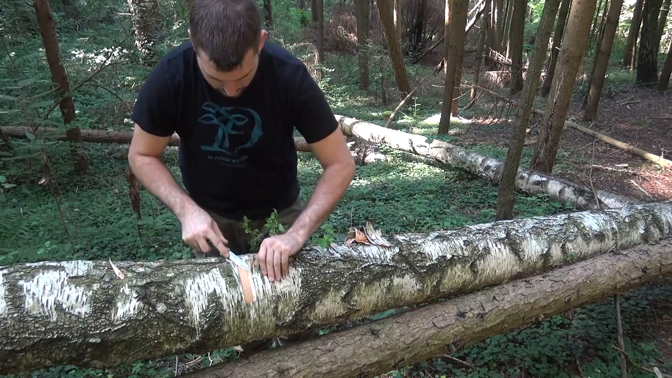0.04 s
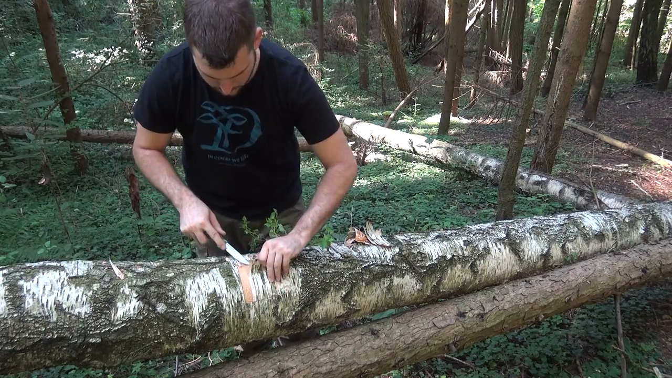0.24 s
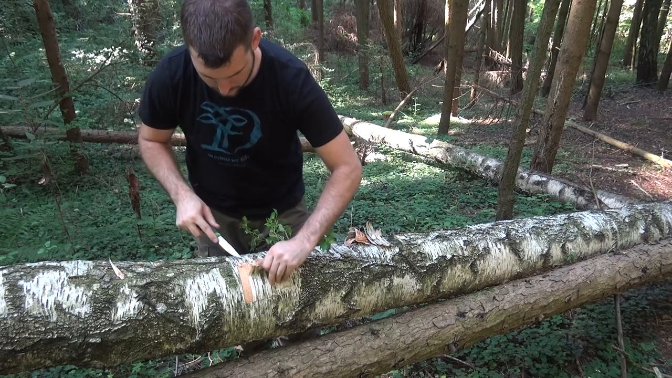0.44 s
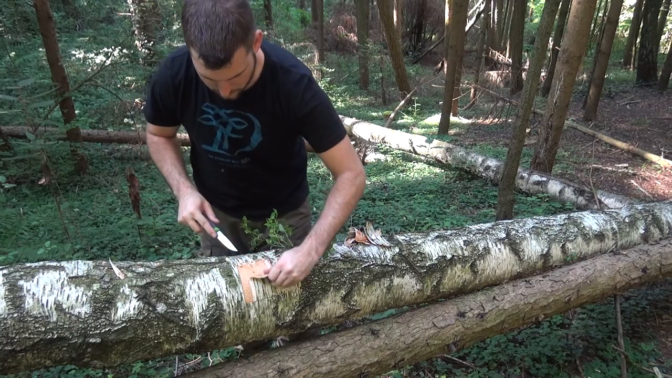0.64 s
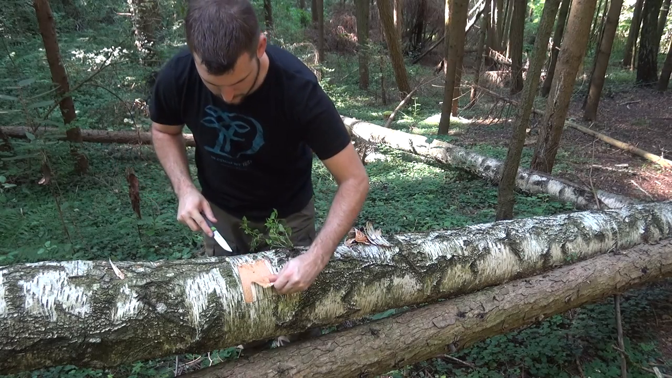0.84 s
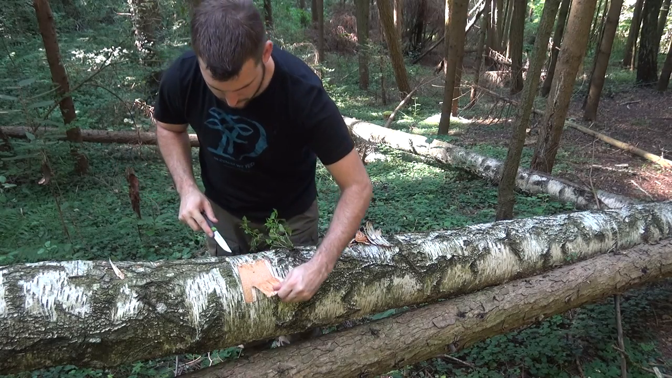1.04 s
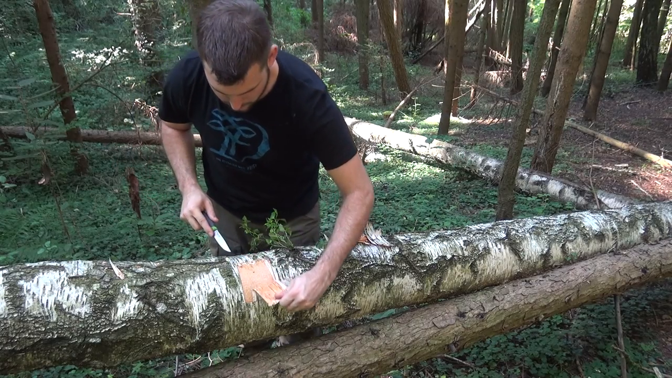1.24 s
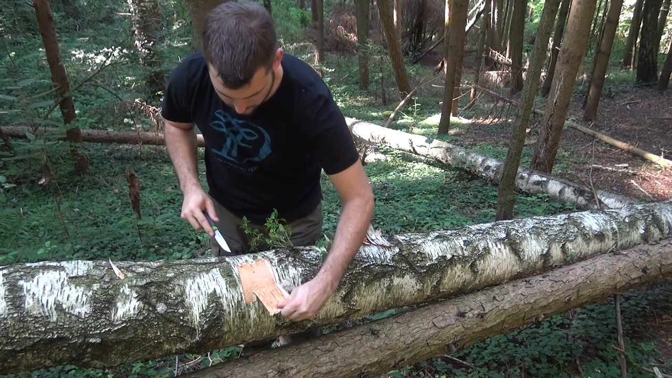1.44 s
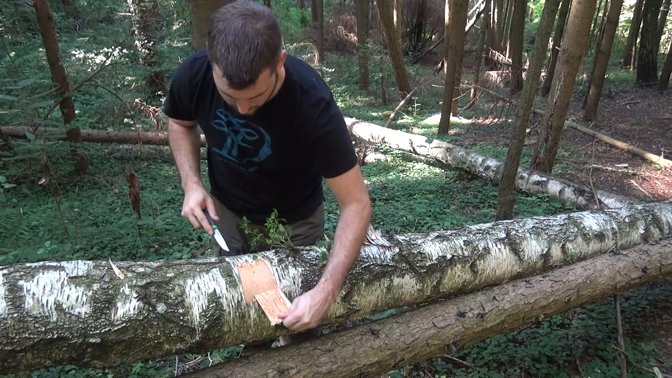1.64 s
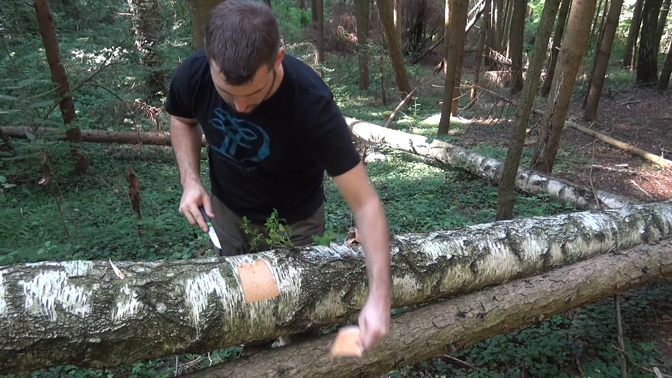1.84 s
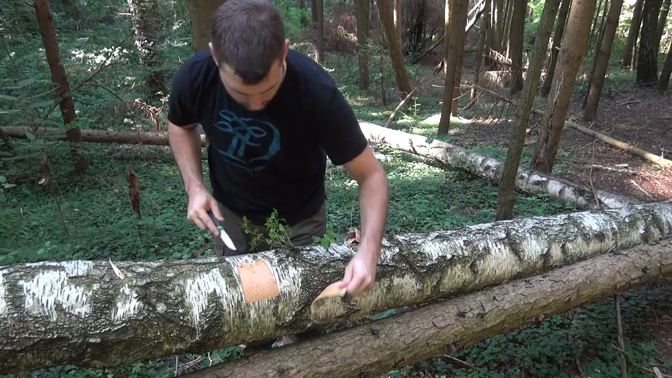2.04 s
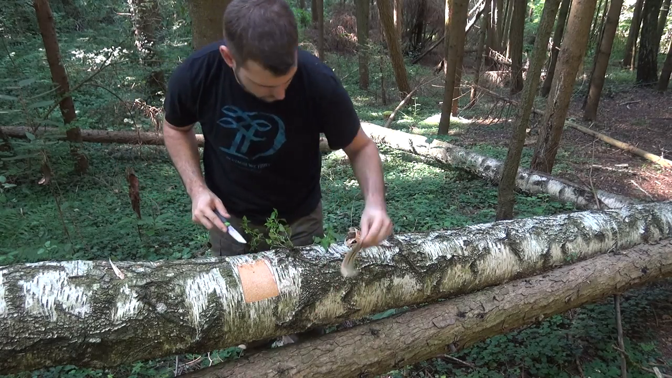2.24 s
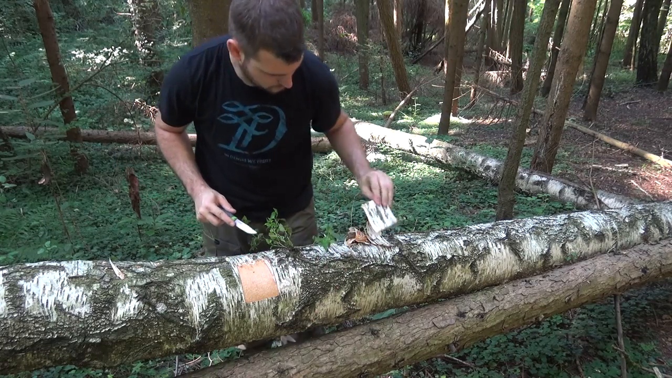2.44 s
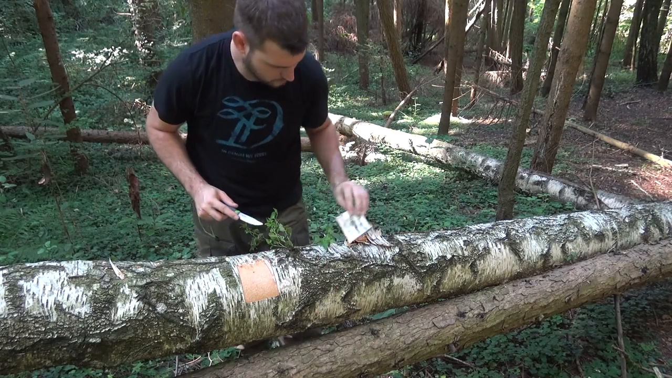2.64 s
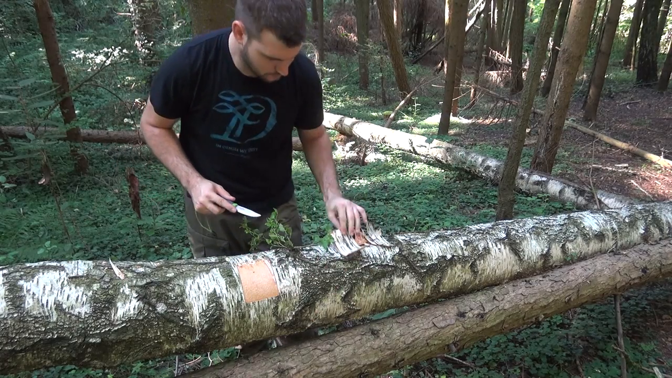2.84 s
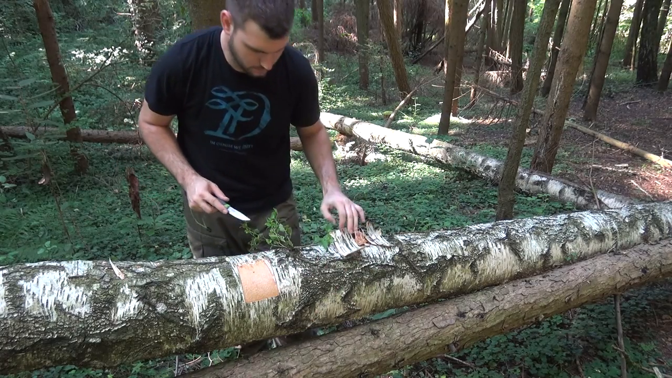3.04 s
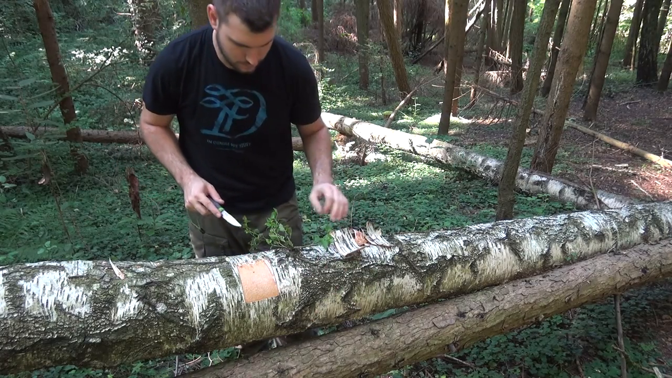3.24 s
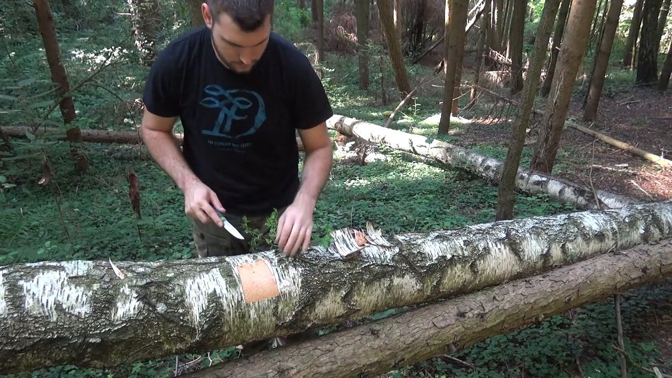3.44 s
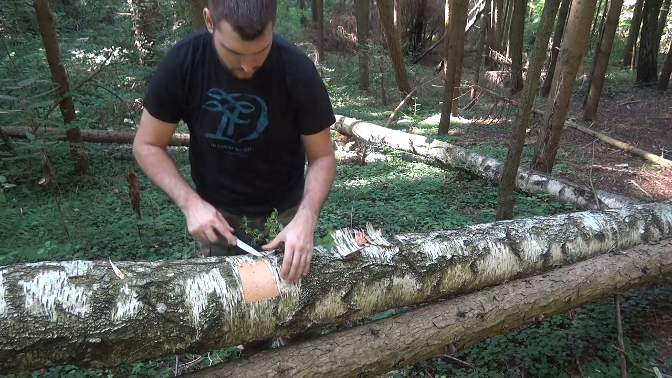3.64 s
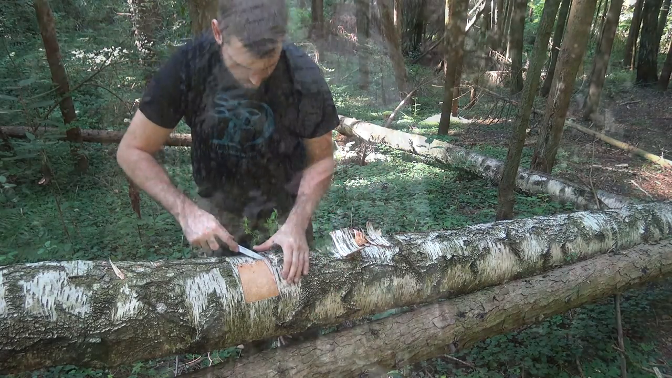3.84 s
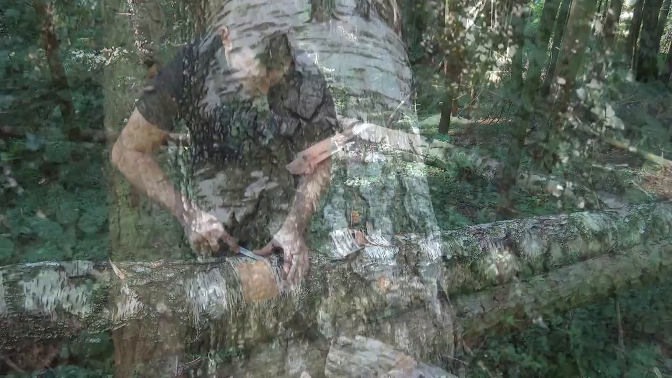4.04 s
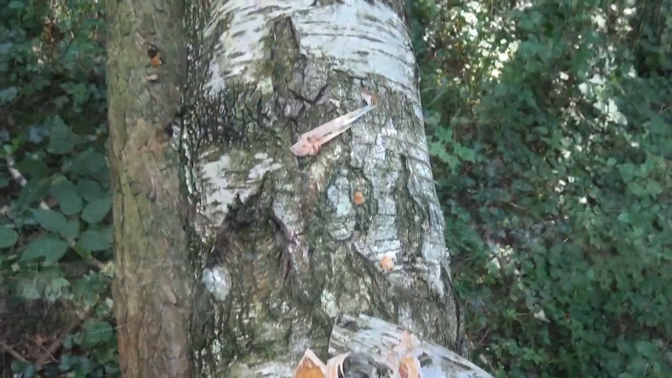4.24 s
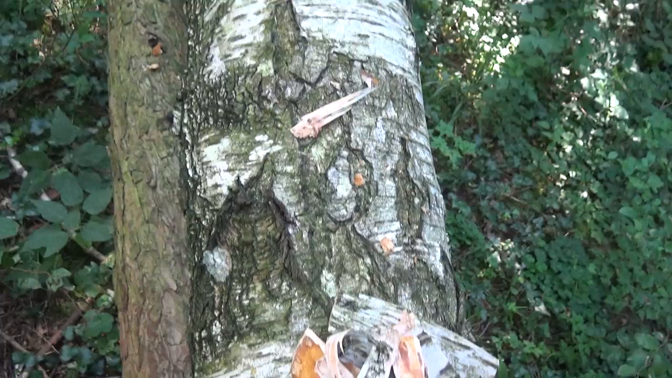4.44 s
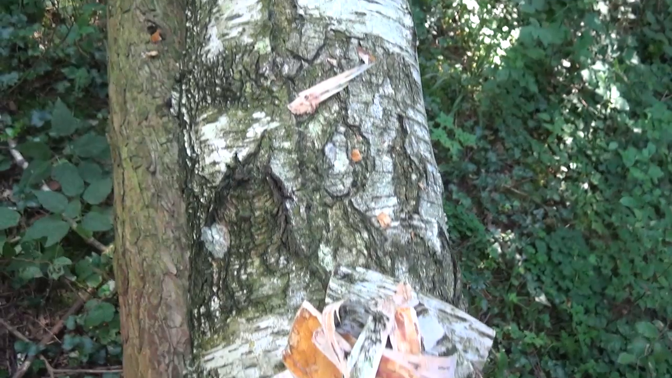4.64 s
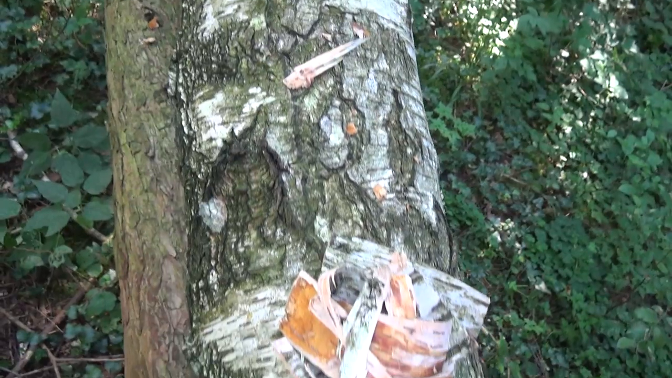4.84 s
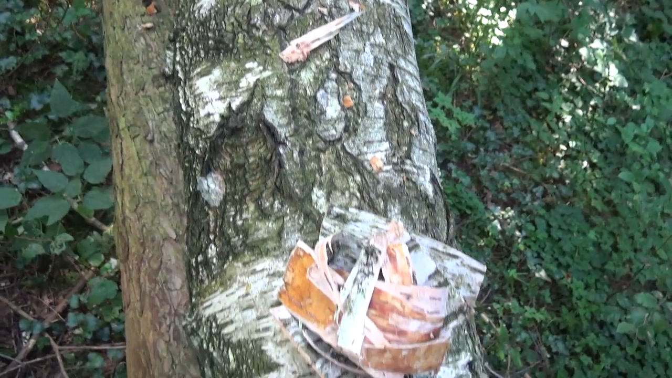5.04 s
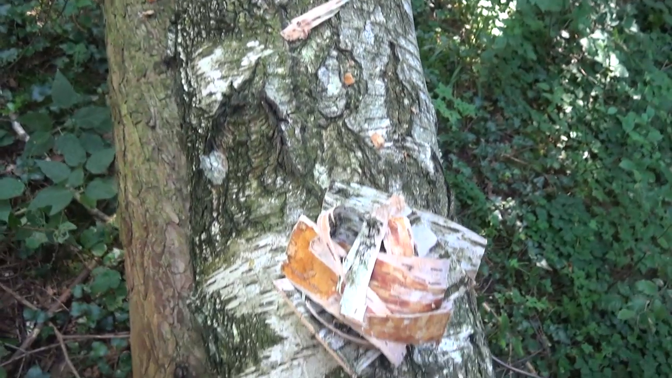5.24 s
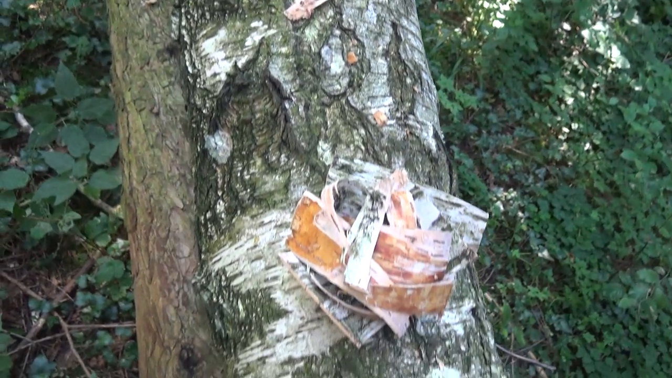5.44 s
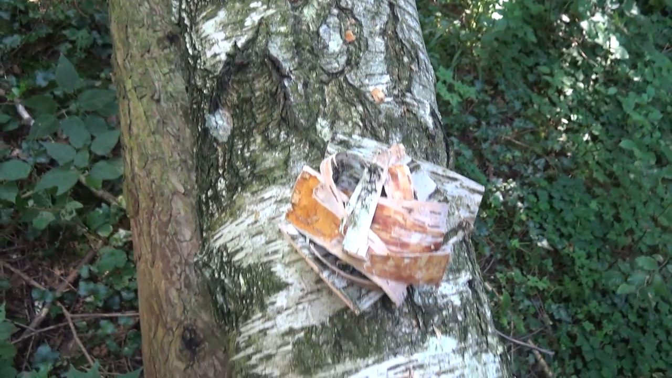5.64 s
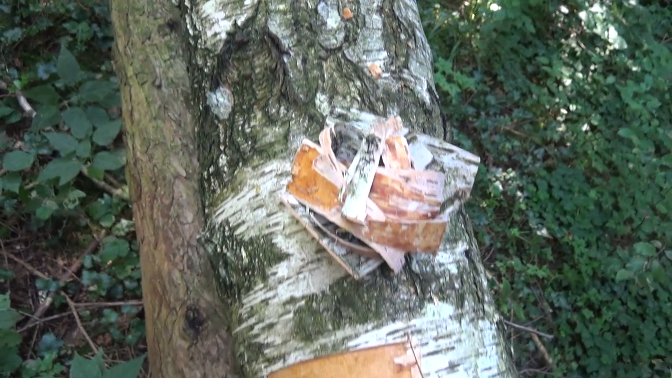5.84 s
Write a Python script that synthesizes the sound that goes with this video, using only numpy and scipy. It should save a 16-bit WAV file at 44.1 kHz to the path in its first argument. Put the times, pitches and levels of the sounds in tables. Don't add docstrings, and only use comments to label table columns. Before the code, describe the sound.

Birch bark ticks and rustles, then cracks loose with a sharp snap and hollow thump, while small birds whistle in an echoing forest.

```python
import sys
import numpy as np
from scipy import signal
from scipy.fft import rfft, irfft, next_fast_len
from scipy.io import wavfile
from scipy.ndimage import uniform_filter1d, map_coordinates

SR = 44100
rng = np.random.default_rng(int(sys.argv[2]) if len(sys.argv) > 2 else 0)


def master(y):
    cut = np.clip(np.atleast_2d(y).T, -1, 1)
    pcm = np.round(cut * 32767)
    wavfile.write(sys.argv[1], SR, pcm.astype(np.int16))


def ratio(d):
    e = np.asarray(d, float) / 20
    return 10 ** e


N = 260190

# (time [s], first view level [dB], second view level [dB])
VIEWS = [
    (0, -53.5, -110),
    (3.53, -53.5, -110),
    (3.56, -51.5, -55.5),
    (4.5, -55, -54),
    (4.57, -110, -54.5),
    (5.9, -110, -55.5),
]
# (frequency [Hz], density [dB per Hz])
WIDE_HUSH = [(15, -27), (30, -10.5), (80, -0.5), (130, -9.5), (370, -11.5), (490, -18), (600, -15),
             (950, -18.5), (1370, -17.5), (2100, -22), (3400, -30), (7500, -24), (10500, -33.5),
             (16000, -44.5)]
# (frequency [Hz], density [dB per Hz])
CLOSE_HUSH = [(15, -52), (40, 3.5), (130, -1), (380, -12), (650, -8), (920, -16.5), (1300, -15),
              (2200, -20.5), (3000, -25), (4400, -26), (7000, -21), (10000, -28), (16000, -38.5)]
# (centre [Hz], width [Hz], level [dB])
GROUND_DIPS = [(938, 51, -7), (698, 37, -4)]
# (time [s], pitch [Hz], level [dB])
ENGINE = [(0, 60.2, -56), (.4, 57.73, -57), (.8, 58.15, -58), (1.2, 60.3, -56.5), (1.6, 60.55, -64),
          (2, 62.6, -62), (2.4, 65.46, -58.5), (2.8, 67.6, -63), (3.2, 69.24, -57.5), (3.6, 72.8, -56),
          (3.9, 74.5, -60.5), (4.3, 72, -56), (4.6, 70.5, -67.5)]
# (centre [Hz], width [Hz], level [dB])
WHIRR = [(1100, 30, -12), (1340, 28, 0), (1690, 80, -10), (2160, 60, -14)]
# (frequency [Hz], correlation [-1 to 1])
ALIKE = [(60, 1), (130, 0.74), (290, 0.42), (640, -0.23), (1410, -0.22), (3100, 0.8), (6820, 0.16),
         (15000, -0.14)]
# (frequency [Hz], left minus right [dB])
HUSH_LEAN = [(60, -11), (110, -3.5), (200, -7), (380, -4.5), (700, -7), (1290, -9.5), (2380, -7.5),
             (4400, -8), (8120, 2.5), (15000, -19)]
# (frequency [Hz], decay time T60 [s])
TREES_T60 = [(200, 0.99), (2000, 0.96), (5000, 0.99), (10000, 0.65)]

# (time after its start [s], pitch [Hz], level [dB])
PHRASE = [
    [(0, 4350, -62), (.008, 3700, -58), (.018, 3360, -58), (.04, 3280, -62)],
    [(.029, 3550, -54), (.042, 4100, -49), (.058, 4510, -48), (.073, 4550, -49), (.093, 4790, -45),
     (.145, 5040, -48), (.187, 5260, -46), (.207, 5720, -54), (.224, 6400, -57)],
    [(.291, 6600, -65), (.303, 6950, -62)],
    [(.31, 8200, -68), (.322, 7100, -63), (.332, 6200, -54), (.341, 5500, -56), (.352, 5200, -54),
     (.372, 5330, -58), (.4, 5480, -61)],
]
# (time [s], stretch [ratio], level [dB], lead-in level [dB], closing notes level [dB])
SONG = [
    (.010, .995, -3, -8, 5),
    (.447, 1, -1.5, -2, 4),
    (.885, .99, -1.5, -2, 4.5),
    (1.319, 1.015, -3.5, 0, -4),
]
SONG_PITCH = [.977, 1.002, 1.003, .998]
# (time after its start [s], pitch [Hz], level [dB])
CHIP = [
    [(0, 3210, -65), (.008, 4050, -60.5), (.017, 4930, -57)],
    [(.011, 4890, -52.5), (.019, 7080, -47.5)],
    [(.021, 8000, -52), (.025, 7410, -54.5), (.03, 6930, -46.5), (.035, 6510, -41), (.039, 6140, -45)],
    [(-.002, 6430, -54), (.003, 7240, -66), (.012, 9100, -63)],
]
# (time [s], stretch [ratio], level [dB], first note level [dB], upper voice level [dB])
CHIPS = [
    (4.592, 0.99, 1.5, 2, 2),
    (4.684, 0.98, 3, 2, -5),
    (4.787, 1.01, 0, 4.5, -7),
]
# (start [s], end [s], first pitch
# [Hz], last pitch [Hz], level [dB])
FAR_NOTES = [(0, 0.065, 5430, 5600, -65), (.523, .55, 7400, 7900, -67), (.545, .575, 7900, 7300, -67),
             (.58, .62, 7500, 7000, -72), (1.83, 1.899, 8150, 8040, -73), (2.124, 2.269, 8220, 8050, -69),
             (2.475, 2.532, 9340, 8860, -61.5), (2.528, 2.574, 8790, 8670, -57.5),
             (2.306, 2.442, 6140, 5850, -69.5), (2.459, 2.543, 6230, 6040, -66),
             (2.501, 2.56, 5700, 5750, -68), (1.405, 1.43, 7700, 7300, -69),
             (3.044, 3.086, 4680, 4500, -61.5), (3.843, 4.104, 7226, 6900, -72),
             (4.2, 4.44, 5160, 5020, -71), (5.04, 5.2, 3900, 3770, -76), (5.49, 5.56, 4650, 4300, -74),
             (5.57, 5.66, 4300, 4440, -77), (5.839, 5.874, 6700, 7900, -66), (5.867, 5.89, 7870, 8000, -67)]
# (time [s], first pitch [Hz], climb [Hz], level [dB])
TRILL = [(2.613, 7920, 947, -50), (2.715, 8000, 900, -50.5), (2.81, 7920, 551, -50),
         (2.9, 7930, 492, -51.5), (2.975, 7930, 350, -54), (3.063, 7790, 350, -53), (3.152, 7930, 450, -54),
         (3.272, 7860, 550, -54), (3.372, 7900, 501, -62)]
# (time [s], share of climb [0 to 1], level [dB])
TRILL_SHAPE = [(0, 0.012, -1.5), (.012, 0.154, -0.5), (.02, 0.356, -4.5), (.034, .6, -4), (.058, 1, -8.5)]
# (time [s], first pitch [Hz], climb [Hz], level [dB])
WARBLE = [(2.558, 5000, 320, -59), (2.61, 5000, 150, -64), (2.658, 4960, 250, -59), (2.74, 4950, 300, -60),
          (2.845, 4890, 279.6, -60), (2.935, 4400, 470, -61), (3.158, 4400, 420, -58)]
# (time [s], share of climb [0 to 1], level [dB])
WARBLE_SHAPE = [(0, 0.016, -6), (.025, 0.284, -4.5), (0.034, .7, 0.5), (.044, 1, -3)]
# (time [s], length [s], level [dB])
PIPING = [
    (4.762, 0.105, -71),
    (5.24, 0.18, -69),
    (5.685, 0.097, -68.5),
    (5.825, 0.064, -71),
]
PIPING_HZ = 3450

# (time [s], peak level [dB], middle resonance [dB], low resonance [dB])
TICKS = [(.0139, -36.5, -19, -10), (.0583, -49, -13, -1), (.6511, -58, 4, -10), (.7246, -41, 10, 2.5),
         (.7312, -50, -8, -15), (.7543, -41, -8, -21), (.805, -45, 5, -18), (1.547, -46, 6, -6),
         (1.5674, -33.5, -2, -15), (1.5978, -40, -21, -6.5), (2.0144, -54, -3, -7), (2.048, -57, 12, 0),
         (2.0779, -36.5, 3.5, -11), (2.3245, -60, 6, 0), (2.3498, -61, 9, 1), (2.7605, -62, 6, 0),
         (2.3904, -54, 2, 5), (2.7968, -52, 10, 10.5), (2.8103, -44.5, 1, 9.5), (3.5997, -45, 0, -14),
         (3.7555, -60, -6, 11), (3.876, -60, 6, -5), (3.9074, -56, 0, 4), (3.961, -60, 3, 0),
         (4.1855, -30, -3, -7), (4.2157, -53, -10.5, -1)]
# (time [s], peak level [dB])
THREADS = [(.3945, -55), (.406, -47.5), (.4439, -49), (.4525, -50), (0.59, -54), (.819, -42), (.9396, -43),
           (.9734, -48), (1.1026, -34), (1.1264, -47.5), (1.1403, -43), (1.2053, -32.5), (1.27, -33),
           (1.3804, -45), (1.385, -46), (1.5757, -43.5), (1.5855, -42), (1.6235, -44), (1.642, -42),
           (2.0368, -53)]
THREAD_MIDDLE_DB, THREAD_LOW_DB = -7, -21
# (time [s], length [s], level [dB])
FRAYING = [
    (0.413, 0.062, -51.5),
    (.945, .035, -55),
    (1.106, .05, -50),
    (1.542, 0.056, -55),
]
# (start [s], length [s], level [dB],
# centre [Hz], width [Hz])
RUBS = [(.28, .38, -59.5, 7200, 6000), (.127, .042, -55, 7000, 3600), (.121, 0.058, -58.5, 2100, 1800),
        (1.7525, 0.017, -44, 2170, 3000), (1.756, 0.016, -30, 4000, 2500), (2.375, .03, -60.5, 4000, 3000),
        (1.768, 0.014, -30.5, 3300, 2600), (1.783, 0.012, -36, 2360, 2200), (1.776, .15, -57.5, 2100, 4300),
        (2, .052, -70, 6010, 6000), (2.13, 0.043, -55.5, 5200, 8900), (2.1, 0.041, -64, 4400, 5050),
        (2.8, 0.034, -52, 3400, 4000), (3.2, .054, -69, 6400, 7900), (2.794, .019, -54.5, 1090, 230),
        (3.9, .057, -64, 7000, 7150)]
# (time [s], length [s], level [dB])
PEELS = [(.02, .027, -64), (.58, 0.14, -64.5), (0.73, .14, -72), (.931, .073, -67), (1.096, 0.068, -59),
         (1.27, 0.15, -67), (1.538, .12, -61), (1.734, .03, -49), (2.412, .036, -69), (3.578, .13, -68),
         (4.157, .034, -63), (4.404, .12, -66.5)]
PEEL_HZ, PEEL_WIDTH_HZ = 9400, 6300
# (time [s], peak level [dB], pitch [Hz])
SNAPS = [
    (0.7237, -17, 5800),
    (1.7624, -27, 13000),
    (1.7665, -5, 4000),
    (1.7814, -13.5, 3000),
    (4.1855, -24, 11000),
]
SNAP_CYCLES = 0.44
# (time [s], peak level [dB], ring [Hz], bright edge [dB], hollow thump [dB])
BREAK = [(.7238, -24, 6300, -5, -40), (4.1863, -22.5, 6400, -16, -40), (.7238, -32.5, 1730, -12, -25),
         (4.1864, -24.5, 2400, -6, -22), (4.1862, -29, 3577, -15, -40), (4.1877, -30, 2350, -15, -25),
         (3.7555, -45, 1500, -15, -30), (1.7612, -30, 7500, -13, -30), (1.763, -22, 6136, -4, -34),
         (1.7637, -20, 3300, -11, -34), (1.7661, -8, 3170, -11, -23), (1.7661, -4, 4080, -11, -25),
         (1.766, -17, 10000, -20, -40), (1.7655, -17, 4100, -12, -30), (1.7664, -9.5, 1670, -14, -38.5),
         (1.7700, -14.5, 1820, -22, -10), (1.7739, -10, 1710, -23, 0), (1.7745, -18, 3150, -12, -23),
         (1.7772, -33, 1300, -18, 15), (1.7811, -11, 2310, -15, -12), (1.7816, -14, 3300, -16, -12),
         (1.7822, -20, 6100, -8, -20), (1.7885, -30, 3300, -18, -15)]
RING_T60_S, RING_DAMPING = 0.0077, 0.56
# (centre [Hz], width [Hz], level [dB])
HOLLOW = [
    (655, 42, 0),
    (830, 80, -10.5),
    (195, 63, -12),
    (94, 34, -11),
]

# (frequency [Hz], left minus right [dB])
NEAR_LEAN = [(60, -3), (110, 12), (200, -22.5), (380, 8), (700, -5.5), (1290, -11), (2380, -4.5),
             (4400, -6), (8120, 0), (15000, -8)]
# (frequency [Hz], left lead [rad])
NEAR_LEAD = [(100, 0.5), (1000, -0.1), (4500, 0.67), (8000, 1.1), (12000, 1.34), (16000, 2.9)]


def unit(x):
    return x / np.sqrt(np.mean(x ** 2) + 1e-20)


def along(points, hz):
    f, v = np.transpose(points)
    return np.interp(np.log(hz + 1), np.log(f + 1), v)


def curves(rows):
    s, *cols = np.transpose(rows)
    return [np.interp(np.arange(N) / SR, s, c) for c in cols]


def wobble(rate):
    knots = rng.standard_normal(int(N * rate / SR) + 4)
    return map_coordinates(knots, [np.arange(N) * rate / SR])


def filtered(x, response):
    m = next_fast_len(N + SR // 2)
    return irfft(rfft(x, m) * response(np.fft.rfftfreq(m, 1 / SR)), m)[..., :N]


def modes(rows):
    def response(f):
        total = 0
        for k, (c, w, db) in enumerate(rows):
            total = total + (-1) ** k * ratio(db) * 1j * f * w / (c * c - f * f + 1j * f * w)
        return total
    return response


def add(track, s, x):
    part = track[..., max(round(s * SR), 0):][..., :x.shape[-1]]
    part += x[..., :part.shape[-1]]


def stereo(pair, response):
    turn = lambda hz: np.arccos(np.clip(along(ALIKE, hz), -1, 1)) / 2
    a, b = filtered(pair, lambda hz: response(hz) * [np.cos(turn(hz)), np.sin(turn(hz))])
    return filtered(np.array([a + b, a - b]), lambda hz: ratio(along(HUSH_LEAN, hz) * [[.5], [-.5]]))


def hush(spectrum, patchy_db):
    z = signal.stft(rng.standard_normal((2, N)), nperseg=512)[2]
    field = uniform_filter1d(rng.standard_normal(z.shape[1:]), size=6, axis=0)
    field = uniform_filter1d(field, size=14, axis=1)
    pair = signal.istft(z * ratio(patchy_db * unit(field)), nperseg=512)[1][:, :N]
    return unit(stereo(pair, spectrum))


def engine_hum():
    hz, db = curves(ENGINE)
    phase = 2 * np.pi * np.cumsum(hz + 4.57 * wobble(12)) / SR
    return ratio(db + 2.3 * wobble(4.8)) * np.sin(phase) * ratio([[-4.5], [3]])


def forest():
    first_db, second_db = curves(VIEWS)

    def wide(f):
        dips = sum(db * np.exp(-.5 * ((f - c) / w) ** 2) for c, w, db in GROUND_DIPS)
        return ratio(along(WIDE_HUSH, f) + dips)

    first = hush(wide, patchy_db=1.3) + ratio(56) * engine_hum()
    second = hush(lambda f: ratio(along(CLOSE_HUSH, f)), patchy_db=2.0)
    second = second + ratio(-3.5) * hush(modes(WHIRR), patchy_db=1.5)
    return ratio(first_db) * first + ratio(second_db) * second


def bounced(x, echoes):
    return filtered(x, lambda hz: 1 + sum(ratio(db) * np.exp(-2j * np.pi * hz * s) for s, db in echoes))


def trees(x, gap, reach):
    out, step = np.zeros((2, N)), SR * 3 // 10
    for start in range(0, N, step):
        piece = x[None, start:start + step]
        if piece.any():
            hz, t, z = signal.stft(rng.standard_normal((2, SR * 3 // 5)), SR, nperseg=256)
            decay = ratio(-60 * t / (reach * along(TREES_T60, hz)[:, None]))
            tail = signal.istft(z * decay, SR, nperseg=256)[1]
            tail = tail / np.linalg.norm(tail[0])
            add(out, start / SR + gap, signal.fftconvolve(piece, tail, axes=1))
    return out


def whistle(note, flutter_db, waver):
    s, hz, db = np.transpose(note)
    t = np.arange(s[0], max(s[-1], s[0] + .004), 1 / SR)
    knots = t[::160]
    breath, drift = (np.interp(t, knots, rng.standard_normal(len(knots))) for _ in range(2))
    phase = 2 * np.pi * np.cumsum(np.interp(t, s, hz) * (1 + waver * drift)) / SR
    ends = np.clip(np.minimum(t - t[0], t[-1] - t) / 0.0015, 0, 1)
    return np.sqrt(2) * ends * ratio(np.interp(t, s, db) + flutter_db * breath) * np.sin(phase)


def caller(notes, starts, pitches, count, waver, flutter_db):
    out = np.zeros(N)
    for (s, stretch, db, first_db, late_db), pitch in zip(starts, pitches):
        for k, note in enumerate(notes):
            strength_db = db + first_db * (k == 0) + late_db * (k >= count)
            timed = np.array(note) * [stretch, pitch if k < count else 1, 1]
            voice = whistle(timed, flutter_db=flutter_db, waver=waver)
            add(out, s + timed[0, 0], ratio(strength_db) * voice)
    return out


def far_notes():
    paths = []
    for rows, shape in ((TRILL, TRILL_SHAPE), (WARBLE, WARBLE_SHAPE)):
        for s, hz, climb_hz, db in rows:
            paths.append([(s + u, hz + share * climb_hz, db + rel_db) for u, share, rel_db in shape])
    for s, length, db in PIPING:
        paths.append([(s, PIPING_HZ, db), (s + length, PIPING_HZ, db)])
    for s, end, hz, last_hz, db in FAR_NOTES:
        paths.append([(s, hz, db), (end, last_hz, db)])
    return paths


def birds():
    song = caller(PHRASE, SONG, SONG_PITCH, count=2, waver=0.0067, flutter_db=2.5)
    chips = caller(CHIP, CHIPS, [1, 1, 1], count=3, waver=0.006, flutter_db=.6)
    far = np.zeros(N)
    for note in far_notes():
        add(far, note[0][0], whistle(note, flutter_db=4, waver=.009))
    leafy = filtered(trees(chips, gap=0.0019, reach=0.7), modes([(7700, 2200, -2.0), (4500, 2000, -4.5)]))
    near = bounced(song, [(.004, -11), (.011, -12)]) + ratio(0.1) * trees(song, gap=0.012, reach=0.85)
    near = near + bounced(chips, [(.004, -12), (.0075, -13)]) + leafy
    distant = ratio(-3.0) * far + ratio(-2.2) * trees(far, gap=0.0044, reach=0.6)
    return ratio([[-7], [3.5]]) * near + ratio([[-3], [2.2]]) * distant


def fibres(count):
    stray = [(s + length * u, db + 6 * v) for s, length, db in FRAYING for u, v in rng.random((count, 2))]
    return TICKS + [(s, db, THREAD_MIDDLE_DB, THREAD_LOW_DB) for s, db in THREADS + stray]


def ticks():
    bursts, t = np.zeros((3, N)), np.arange(SR // 50) / SR
    fade = ratio(-60 * t / np.array([[.005], [.006], [.008]])) + ratio(-13.0 - 60 * t / 0.051)
    for s, db, middle_db, low_db in fibres(count=5):
        burst = rng.standard_normal((3, len(t))) * fade - 1.6 * (t == 0)
        levels_db = db + np.array([[2.5], [middle_db + 4.0], [low_db + 7.0]])
        add(bursts, s, ratio(levels_db) * burst)
    bands = [(9500, 7700, 0), (5800, 3800, 0), (2420, 3100, 0)]  # (centre [Hz], width [Hz], level [dB])
    return sum(filtered(x, lambda hz: modes([band])(hz) ** 2) for x, band in zip(bursts, bands))


def rustle():
    out = np.zeros(N)
    for s, length, db, hz, width_hz in RUBS + [(*row, PEEL_HZ, PEEL_WIDTH_HZ) for row in PEELS]:
        n = max(int(length * SR), 64)
        noise = rng.standard_normal(SR // 4)
        sizes = rng.standard_normal(SR // 4 // 50 + 1).repeat(50)
        grains = (noise * ratio(3.5 * sizes[:SR // 4]))[:n]
        f = np.fft.rfftfreq(len(grains), 1 / SR)
        coloured = irfft(rfft(grains) * modes([(hz, width_hz, 0)])(f) ** 2, len(grains))
        swell = np.sin(np.pi * np.linspace(0, 1, len(grains)) ** 0.69)
        add(out, s, ratio(db) * unit(coloured) * swell)
    return out


def snaps():
    out, u = np.zeros(N), np.arange(-40, 41) / SR
    for s, db, hz in SNAPS:
        envelope = np.exp(-.5 * (u * hz / SNAP_CYCLES) ** 2)
        add(out, s + u[0], ratio(db) * np.cos(2 * np.pi * hz * u + 0.68) * envelope)
    return out


def crack():
    rings, edges, thumps = np.zeros((3, N))
    t = np.arange(SR // 20) / SR
    for s, db, hz, bright_db, hollow_db in BREAK:
        t60 = RING_T60_S * (hz / 2000) ** -RING_DAMPING
        onset = 1 - np.exp(-t / 0.00027)
        add(rings, s, ratio(db - 60 * t / t60) * np.sin(2 * np.pi * hz * t) * onset)
        add(edges, s, ratio(db + bright_db + 7.5 - 60 * t / 0.0052) * rng.standard_normal(len(t)))
        add(thumps, s, ratio(db + hollow_db + 20.0) * np.hanning(24) / 4)
    bright = modes([(5440, 6700, -5.5), (10500, 2300, -2)])
    spit = filtered(edges, lambda hz: bright(hz) * ratio(-(hz / 9000) ** 4))
    return rings + spit + filtered(thumps, modes(HOLLOW))


def scene():
    bark = ticks() + rustle() + snaps() + crack()

    def ports(hz):
        lean = ratio(along(NEAR_LEAN, hz) * [[.5], [-.5]])
        return lean * np.exp(1j * along(NEAR_LEAD, hz) * [[.5], [-.5]])

    direct = filtered(np.array([bark, bark]), ports)
    return direct + ratio(-23.0) * trees(bark, gap=0.0056, reach=0.4) + birds() + forest()


def top_cut(x):
    return signal.sosfilt(signal.butter(12, 16830, fs=SR, output="sos"), x)


def record(dry):
    top_hz = 15850
    mix = filtered(dry, lambda hz: 1 / (1 + (hz / top_hz) ** 600))
    return top_cut(mix)


dry = scene()
out = record(dry)
master(out)
```